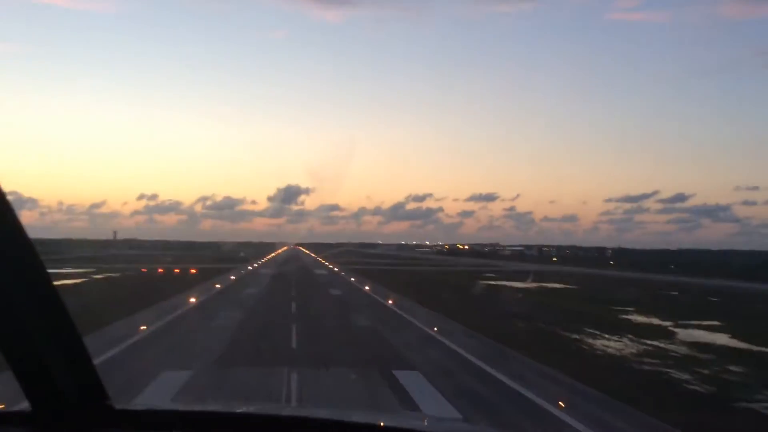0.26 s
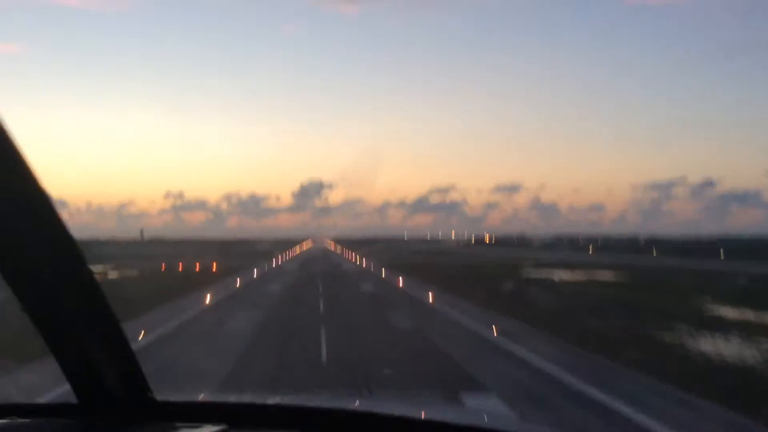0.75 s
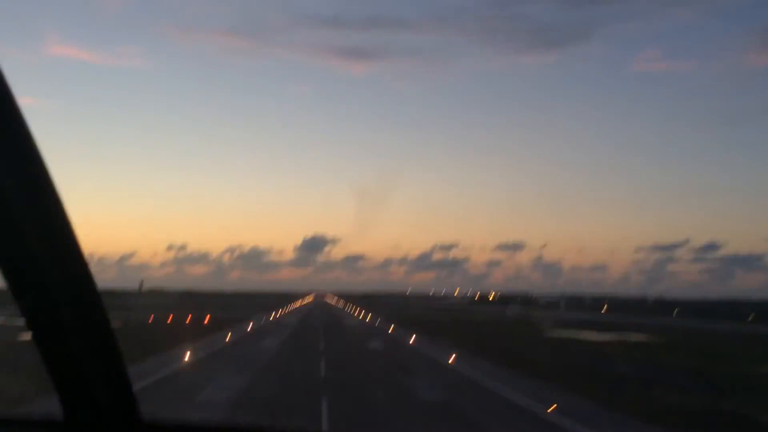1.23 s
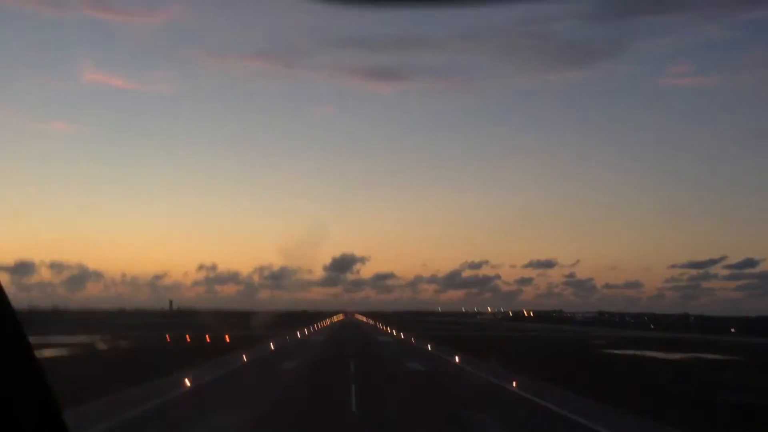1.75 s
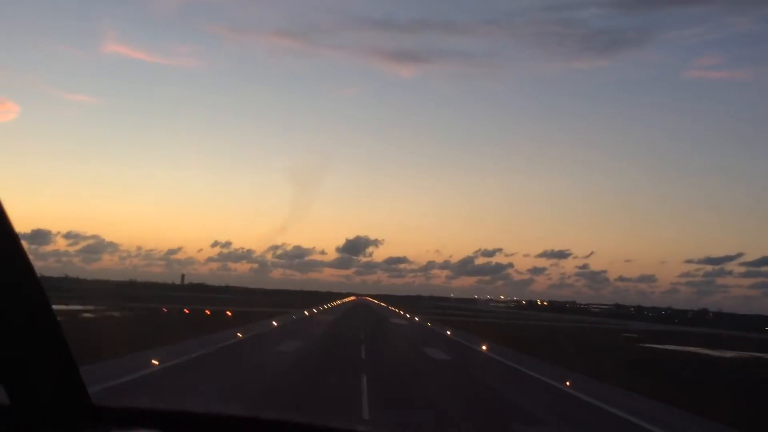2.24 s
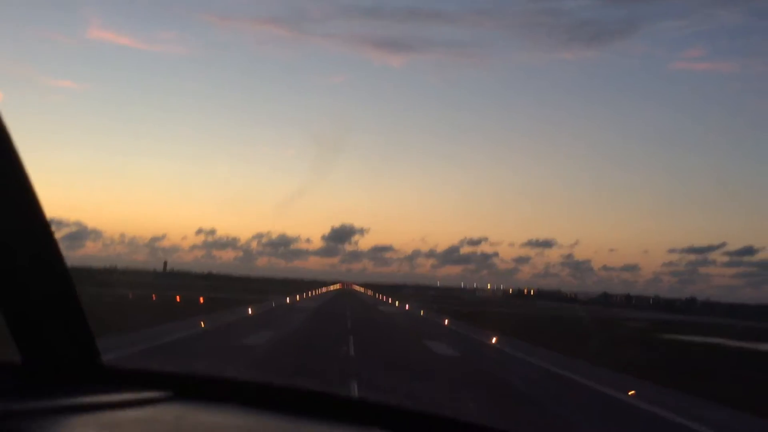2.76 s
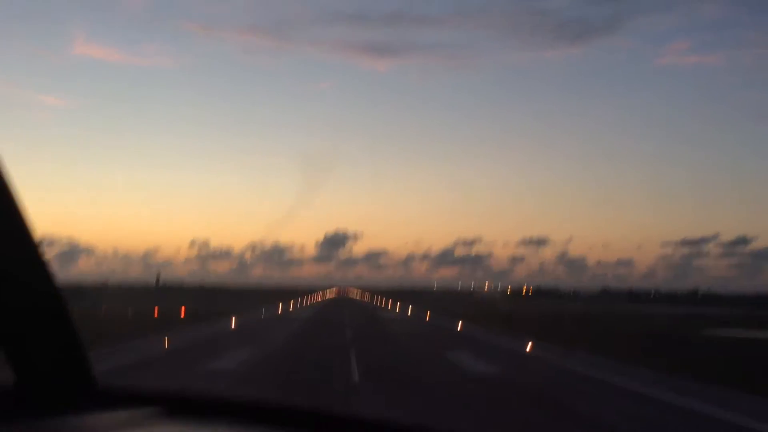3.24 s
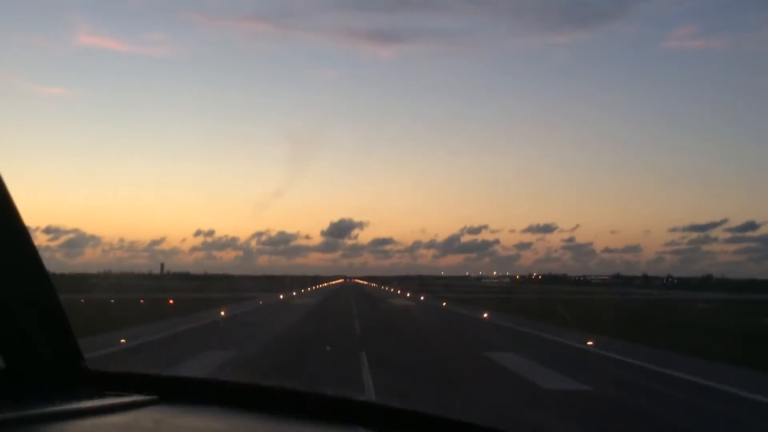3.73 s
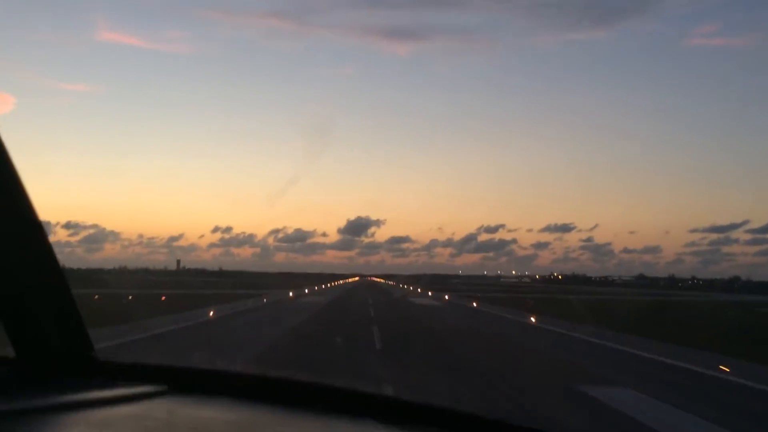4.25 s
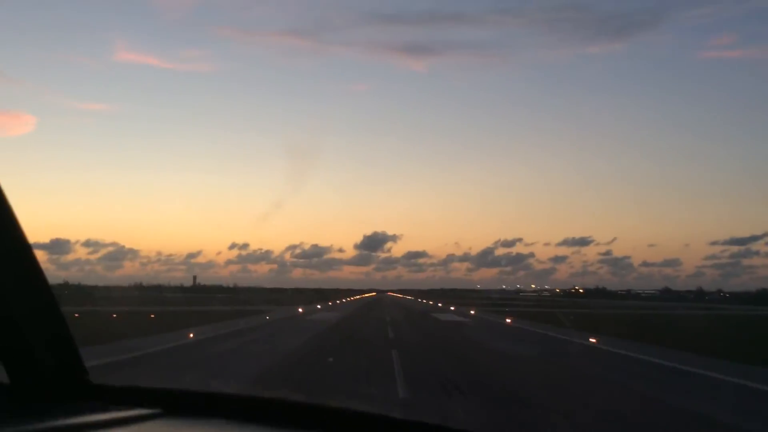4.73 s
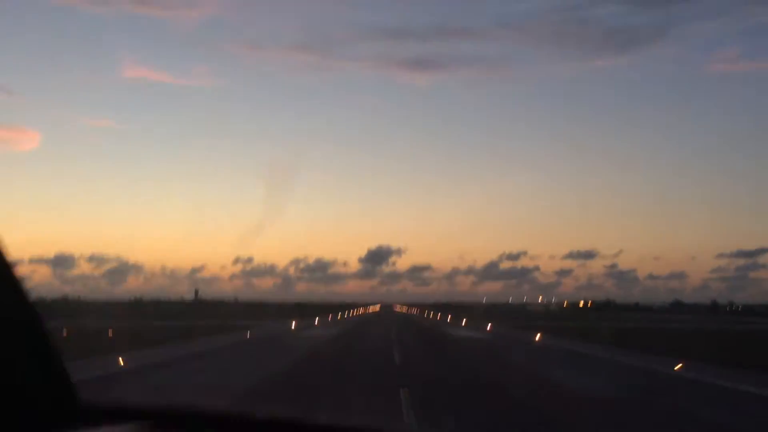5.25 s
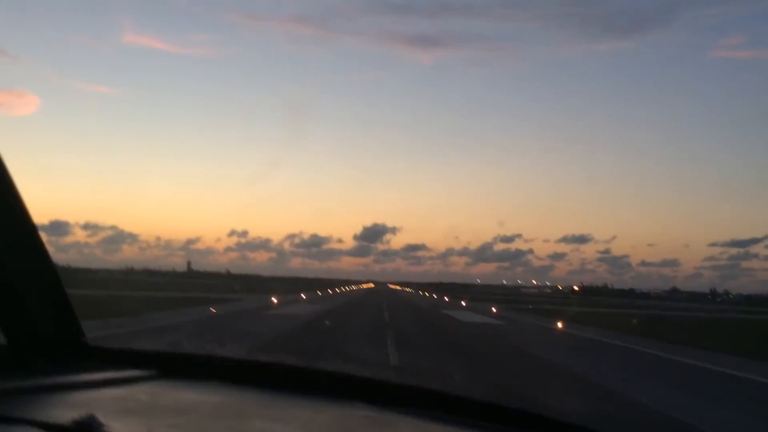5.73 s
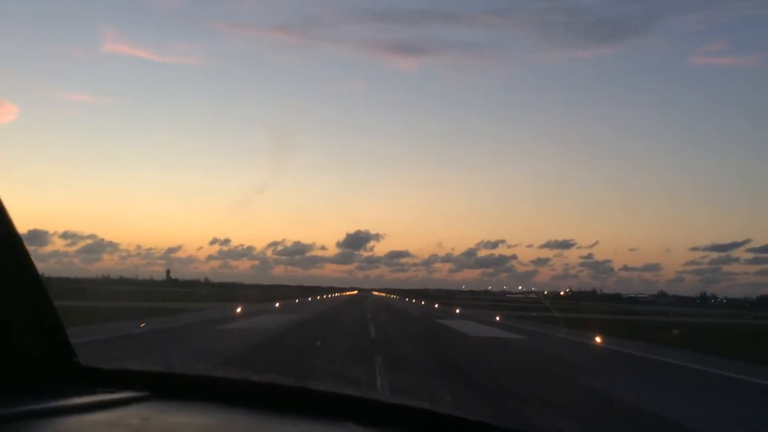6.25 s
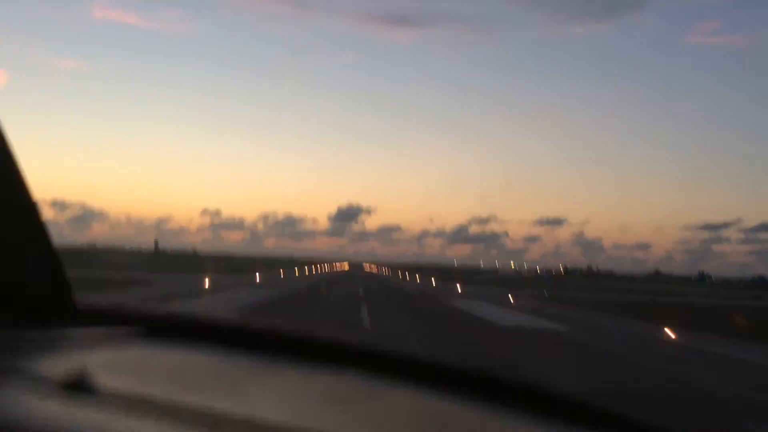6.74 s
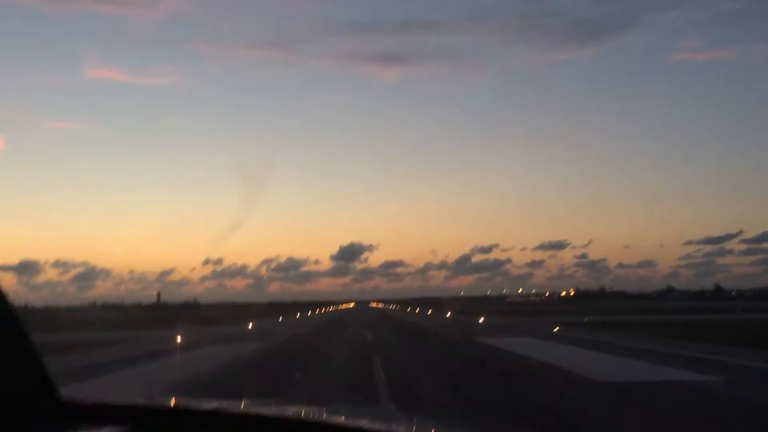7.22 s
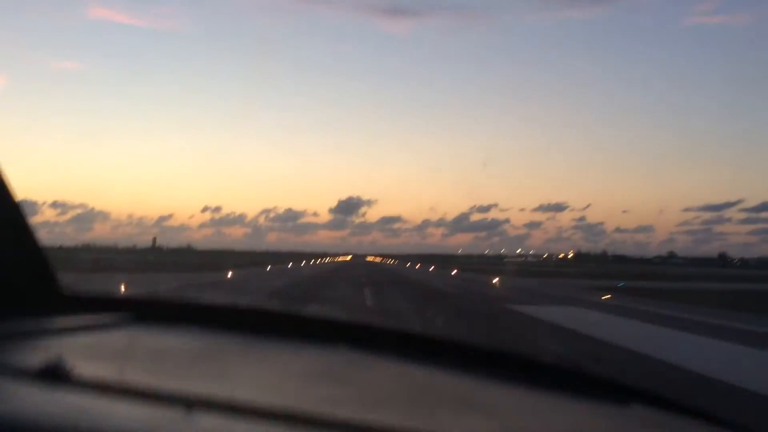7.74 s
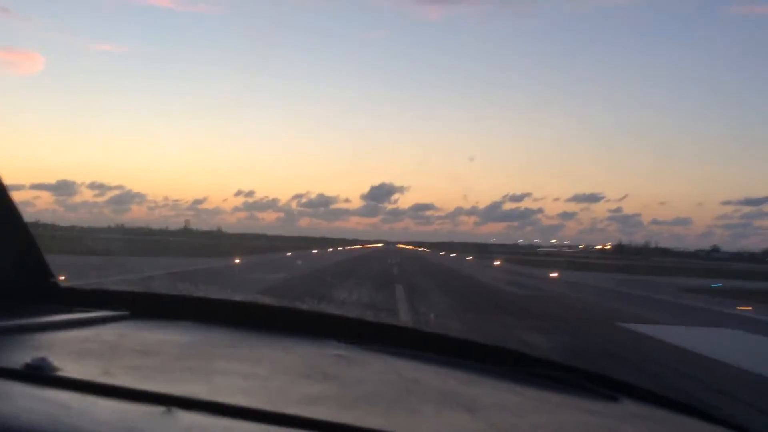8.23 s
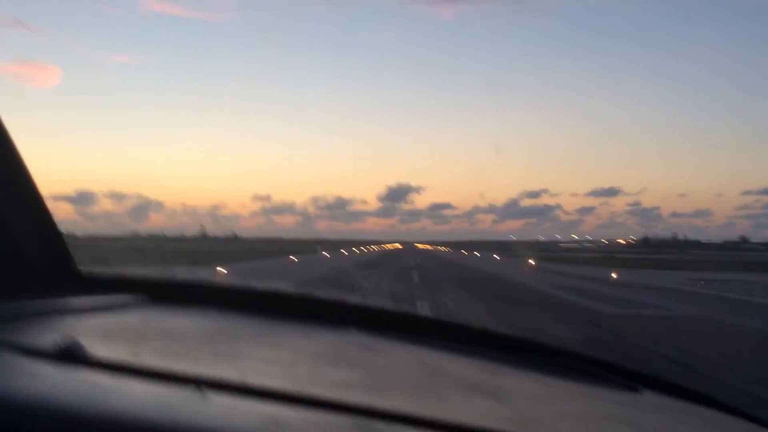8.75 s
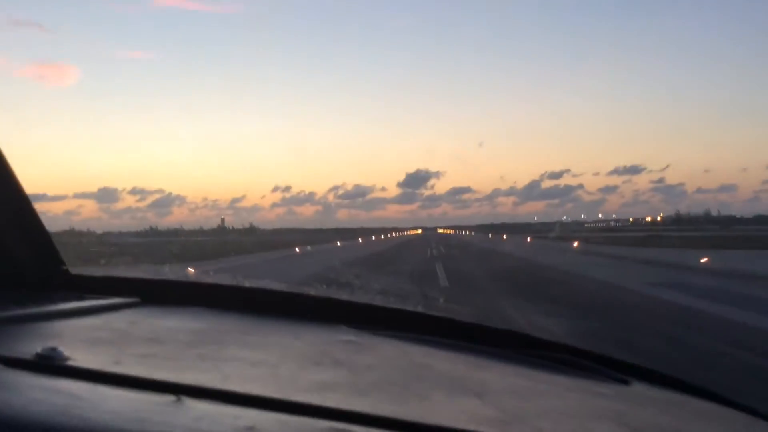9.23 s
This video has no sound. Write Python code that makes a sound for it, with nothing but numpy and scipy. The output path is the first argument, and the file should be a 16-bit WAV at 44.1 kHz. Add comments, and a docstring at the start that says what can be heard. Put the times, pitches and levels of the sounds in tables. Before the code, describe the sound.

Inside a small landing plane, a beating propeller drone sinks in pitch, leaving low rumble and hissing airflow.

```python
"""Cockpit of a small twin piston aircraft in the flare, one microphone inside the cabin.
Both propellers drone at nearly one speed and beat; then the throttles close, the engines slow and
drift apart, and the airframe rumble is left. All around, slipstream roars on the cabin walls and
rings the panels; it hisses and whistles through a door seal."""
import sys
import numpy as np
from scipy import signal
from scipy.fft import rfft, irfft
from scipy.io import wavfile

SR = 44100
rng = np.random.default_rng(int(sys.argv[2]) if len(sys.argv) > 2 else 0)


def int16_out(signal):
    """Quantize to a 16-bit WAV file."""
    q = np.round(np.clip(np.atleast_2d(signal).T, -1, 1) * 32767)
    wavfile.write(sys.argv[1], SR, q.astype(np.int16))


N = 418068

# blade-pass rates; the lead sets the beats: (time [s], near engine [Hz], far engine's lead [Hz])
BLADE_RATES = [(0.0, 81.28, -0.04), (0.4, 80.68, 0.98), (0.8, 80.03, 0.72), (1.2, 79.93, 0.14),
               (1.6, 80.07, 0.32), (2.0, 80.19, 0.33), (2.4, 79.37, 0.98), (2.8, 78.3, 0.19),
               (3.2, 76.62, -0.22), (3.6, 75.33, -0.44), (4.0, 73.95, -0.64), (4.4, 72.39, -0.63),
               (4.8, 71.71, -1.08), (5.2, 70.31, -0.7), (5.6, 69.01, -1.26), (6.0, 67.06, -2.18),
               (6.4, 65.1, -2.34), (6.8, 62.8, -5.28), (7.6, 58.2, -6.3), (8.4, 56.5, -8.4),
               (8.8, 56.3, -9.4), (9.48, 55.3, -8.8)]


def from_db(db):
    """Decibels to gain."""
    return 10 ** (np.asarray(db) / 20)


def rms_one(x):
    """Scale to rms 1."""
    return x / np.sqrt(np.mean(x ** 2) + 1e-20)


def in_time(rows):
    """The columns after a table's time column, interpolated to every sample."""
    times, *columns = np.transpose(rows)
    return [np.interp(np.arange(N) / SR, times, column) for column in columns]


def drift(rate_hz):
    """Slow random wander, rms about 1: low-passed noise, drawn at every 40th sample."""
    hop, run_in = 40, 2000
    pole = np.exp(-2 * np.pi * rate_hz * hop / SR)
    white = rng.standard_normal(N // hop + run_in + 2)
    slow = signal.lfilter([1], [1, -2 * pole, pole ** 2], white)[run_in:]
    return np.interp(np.arange(N) / hop, np.arange(len(slow)), rms_one(slow))


def resonant_noise(hz, width_hz):
    """White noise twice through one resonance, for steep flanks; rms 1."""
    radius = np.exp(-np.pi * width_hz / SR)
    poles = [1, -2 * radius * np.cos(2 * np.pi * hz / SR), radius ** 2]
    once = signal.lfilter([1, 0, -1], poles, rng.standard_normal(N))
    return rms_one(signal.lfilter([1, 0, -1], poles, once))


def banded_noise(colour, flicker_db, flicker_hz, tilt_db=0):
    """Flickering third-octave bands of noise, tilted by tilt_db an octave about 100 Hz; rms 1."""
    hz_points, db_points = np.transpose(colour)
    edges = 20 * 2 ** (np.arange(30) / 3)
    shared_flicker = 0.085 * drift(11.0)
    white = rng.standard_normal((2, N + SR))
    out = 0
    for k, (low, high) in enumerate(zip(edges, edges[1:])):
        hz = np.sqrt(low * high)
        if hz_points[0] < hz < hz_points[-1]:
            bandpass = signal.butter(2, [low, high], "band", fs=SR, output="sos")
            band = signal.sosfilt(bandpass, white[k % 2])[SR:]
            level_db = np.interp(np.log(hz), np.log(hz_points), db_points) + tilt_db * np.log2(hz / 100)
            out += band * from_db(level_db + flicker_db * (shared_flicker + drift(flicker_hz)))
    return rms_one(out)


def blade_angles():
    """Blade-pass phase of the near and the far propeller in radians, each running slightly unevenly."""
    near_hz, lead_hz = in_time(BLADE_RATES)
    near = np.cumsum(near_hz + .06 * drift(6))
    lead = np.cumsum(lead_hz * (1 + .02 * drift(6)))
    return 2 * np.pi * near / SR, 2 * np.pi * (near + lead) / SR


def tone(multiple, angle, level_db, flutter_db):
    """One multiple of the blade rate, fluttering in level."""
    rms = from_db(level_db + flutter_db * drift(9.1))
    return np.sqrt(2) * rms * np.cos(multiple * (angle - np.pi / 2))


def engines(near, far):
    """Propeller and exhaust tones of both engines through the cabin; equal multiples beat."""
    # speed steps at which the levels below are given: (near engine's blade rate [Hz])
    steps_hz = (56, 62.5, 65.5, 71, 77, 81)
    # tones under the blade rate: (multiple, level at each step [dB])
    sub_orders = [(.5, (-60, -52, -46, -41, -47.5, -38)), (.75, (-53, -45, -28, -35, -35.5, -43))]
    # what the cabin passes: (multiple, near engine at each step [dB], far engine at each step [dB])
    orders = [(1, (-28.5, -26, -21.5, -14, -9, -9), (-36, -32, -18.5, -22, -20.5, -19)),
              (1.5, (-31, -27.5, -29, -40, -33.5, -26), (-39, -24, -28, -27, -26, -24)),
              (2, (-24.5, -23.5, -20, -24, -26.5, -32.5), (-30, -28, -31, -30, -26, -26.5)),
              (3, (-39, -50, -38, -35, -36, -32), (-62, -45, -52, -36.5, -38.5, -39)),
              (4, (-56, -61, -39, -42.5, -40, -41.5), (-65, -62, -53, -52, -39.5, -42.5)),
              (5, (-65, -64, -54, -51, -52.5, -48.5), (-62, -55, -50, -43, -43, -42.5)),
              (7, (-59, -64, -62, -55, -62, -50), (-59, -75, -70, -60, -49.5, -45.5))]
    # lag of the far engine's tones, a row per order: (lag at 80 Hz [cycles], more on slowing [cycles/Hz])
    far_lags = [(.112, .025), (-.113, .001), (.306, -.022), (.27, -.012), (-.14, .036), (.37, .095),
                (.345, -.001)]
    # extra strength of the orders from 4x up: (time [s], gain [dB])
    bite = [(0, 4.5), (.2, -6), (.55, -1.5), (1.2, 3.5), (1.7, 2), (2.3, 1.5), (2.9, -0.5), (4.25, -1),
            (4.6, 5), (5.0, -1), (9.48, 1)]
    # the far engine's faint extra tones: (multiple of the blade rate)
    faint_multiples = (2.5, 6, 8, 10, 11, 12)
    # their strength: (level re the far engine's 7x entry in orders [dB])
    faint_db = (2, -5.5, -7, -16, -13, -19)
    near_hz, _ = in_time(BLADE_RATES)
    bite_db, = in_time(bite)
    at_speed = lambda steps_db: np.interp(near_hz, steps_hz, steps_db)
    out = sum(tone(k, near, at_speed(db), flutter_db=-2.0) for k, db in sub_orders)
    for (k, near_db, far_db), (lag, lag_per_hz) in zip(orders, far_lags):
        smear = (k - 1) * (.45 + .25 * drift(.5) / k)  # the cabin delays higher multiples more
        late = 2 * np.pi * (lag + lag_per_hz * (80 - near_hz)) / k
        near_tone = tone(k, near - smear, at_speed(near_db), flutter_db=0.37)
        far_tone = tone(k, far - smear - late, at_speed(far_db), flutter_db=1.1)
        out += (near_tone + far_tone) * from_db(bite_db * (k >= 4))
    far_7x_db = at_speed(orders[-1][2])
    for k, db in zip(faint_multiples, faint_db):
        out += tone(k, far - .45 * (k - 1), far_7x_db + db + 3 * drift(3.0), flutter_db=5.0)
    return out


def airframe():
    """Buffeting of the structure around the microphone: a rumble that fills the gaps between the tones."""
    # course of the rumble: (time [s], level [dB], brightness [dB/octave])
    buffeting = [(0, -27.5, 3.5), (1.1, -22, 2.5), (1.9, -20, 0.8), (2.7, -21, 1.5), (3.5, -25, 2.5),
                 (4.1, -23.5, .5), (4.5, -18, 1), (4.95, -16.5, -3), (5.5, -18.5, 0.8), (6.1, -19.5, 0),
                 (6.55, -20.5, 2.5), (6.8, -20, 1.5), (6.95, -18.5, 2.5), (7.15, -16.5, 0),
                 (7.45, -20, -1.5), (7.7, -19.5, .1), (8.0, -19.5, -0.5), (8.22, -19, 1), (8.45, -16.5, -2),
                 (9.2, -18.5, 0), (9.48, -15.5, -3)]
    # its spectrum before the tilt: (frequency [Hz], relative density [dB])
    colour = [(20, -28.5), (32, -15), (45, -2.5), (65, -1.5), (100, 1.5), (140, -4.5), (200, -13),
              (290, -17), (400, -32.5), (600, -48.5)]
    level_db, tilt_db = in_time(buffeting)
    return from_db(level_db) * banded_noise(colour, flicker_db=0.3, flicker_hz=13.2, tilt_db=tilt_db)


def slipstream(blade_angle):
    """Roar through the walls, ringing panels and door-seal hiss, lightly chopped by each blade's wake."""
    # airflow heard from inside: (time [s], roar [dB], seal hiss [dB], panel gain [dB])
    airflow = [(0, -39, -61, 3), (.6, -40, -62, -3), (.85, -38.5, -60, -4), (1.5, -38, -62, 1.5),
               (2.0, -40, -61.5, -0.8), (3.0, -40, -62, -2), (3.85, -41, -60.5, 1.5), (4.3, -40, -58, 2.5),
               (4.52, -36.5, -57, 0), (4.85, -39.5, -59, 1.5), (5.2, -39.5, -61, 2),
               (5.65, -36.5, -58, 0.5), (5.85, -39, -58.5, 3.5), (6.68, -37, -55.5, -1),
               (7.12, -37.5, -57, 3.5), (7.22, -38, -66, 2), (7.48, -39.5, -60, 3.5), (7.56, -37.5, -53, 3),
               (7.82, -36, -53, 1), (8.04, -38, -55, 4.5), (8.12, -37.5, -63, 4), (8.5, -37.5, -67, 2.5),
               (8.8, -37.5, -58, -0.5), (9.0, -37.5, -69, 2), (9.48, -37.5, -62, 1.5)]
    # spectrum of the roar: (frequency [Hz], relative density [dB])
    colour = [(200, -8.5), (400, -6.5), (520, -2), (800, -9), (1100, -9), (1500, -13), (2200, -16),
              (2600, -20), (4000, -21), (7090, -29.5), (8000, -27.5), (9300, -27.5), (10200, -28),
              (11500, -35), (13200, -56), (15000, -68)]
    # cabin resonances: (frequency [Hz], width [Hz], level re roar before the panel gain [dB])
    panel_modes = [(559.4, 34, -9.5), (662, 100, -11.5), (936, 110, -18.5), (1207, 170, -18.5),
                   (1908, 470, -10.5), (2886, 330, -23.5), (3840, 570, -25.5)]
    roar_db, hiss_db, panel_db = in_time(airflow)
    roar = banded_noise(colour, flicker_db=1.47, flicker_hz=18.3)
    panels = sum(from_db(db + 1.2 * drift(3.0)) * resonant_noise(hz, width)
                 for hz, width, db in panel_modes)
    hiss = from_db(hiss_db + 1.5 * drift(20)) * resonant_noise(hz=8200, width_hz=720)
    chop = 1 + 0.042 * np.sin(blade_angle)
    return chop * (from_db(roar_db) * (roar + from_db(panel_db) * panels) + hiss)


def seal_whistle():
    """Air through the door seal's flexing gap: a wavering noise band, firm near 7500 Hz, else breathy."""
    # the whistle, its pitch set by the gap: (time [s], pitch [Hz], level [dB])
    course = [(0, 7860, -61), (.35, 8000, -67), (.6, 7560, -70), (.9, 8560, -62), (1.3, 9000, -58),
              (1.52, 8220, -63), (1.7, 7250, -64), (2.1, 7300, -72), (2.33, 7670, -59), (2.55, 8080, -68),
              (2.92, 8500, -63), (3.07, 7640, -60), (3.13, 7620, -55), (3.22, 7900, -62), (3.4, 7900, -66),
              (3.5, 7600, -62), (3.61, 7610, -58), (3.7, 8050, -66), (3.86, 7600, -60), (4.06, 7680, -60),
              (4.17, 8200, -62), (4.27, 7800, -60), (4.6, 7700, -58), (4.95, 7560, -61), (5.15, 7150, -68),
              (5.48, 7530, -59), (5.8, 7400, -61), (5.92, 6900, -66), (6.12, 6740, -63), (6.3, 7000, -68),
              (6.5, 7300, -63), (6.58, 7750, -55), (6.7, 7700, -57), (6.8, 6800, -63), (6.97, 5990, -61),
              (7.2, 6680, -64), (7.6, 5600, -65), (7.74, 5900, -67), (7.82, 7100, -63), (7.94, 6900, -65),
              (8.07, 5730, -63), (8.37, 5950, -61), (8.85, 6850, -61), (9.0, 6200, -62), (9.48, 6460, -63)]
    firm_hz, breathy_hz, waver_hz = 110, 300, 20  # the two bands' half-widths; pitch spread
    hz, db = in_time(course)
    angle = 2 * np.pi * np.cumsum(hz + waver_hz * drift(20)) / SR
    lowpasses = [signal.butter(2, width, fs=SR, output="sos") for width in (firm_hz, breathy_hz)]
    firm, breathy = [rms_one(signal.sosfilt(sos, rng.standard_normal((2, N)))) for sos in lowpasses]
    breathy_share = np.clip(abs(hz - 7500) / 1100, .05, 1) ** 2
    in_phase, quadrature = np.sqrt(1 - breathy_share) * firm + np.sqrt(breathy_share) * breathy
    return from_db(db + .6 * drift(12)) * (in_phase * np.cos(angle) + quadrature * np.sin(angle))


def scene():
    """Everything as it reaches one spot in the cabin, in mono."""
    near, far = blade_angles()
    return (engines(near, far) + airframe() + slipstream(near) + seal_whistle())[None]


def record(dry):
    """The cockpit microphone: the loudest crests are rounded, the treble steps down, the top is cut."""
    ceiling, shelf_hz, shelf_db, cutoff_hz = .97, 9600, -2.5, 15200
    rounded = dry / (1 + (dry / ceiling) ** 12) ** (1 / 12)
    hz = np.arange(N // 2 + 1) * SR / N
    shelf = from_db(shelf_db / (1 + (shelf_hz / (hz + 1)) ** 40))
    dulled = irfft(rfft(rounded) * shelf, N)
    return signal.sosfilt(signal.ellip(10, .5, 60, cutoff_hz, fs=SR, output="sos"), dulled)


dry = scene()
out = record(dry)
int16_out(out)
```